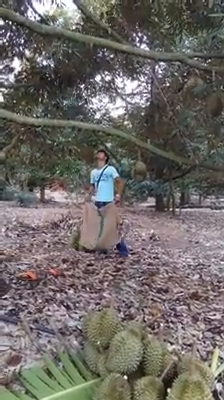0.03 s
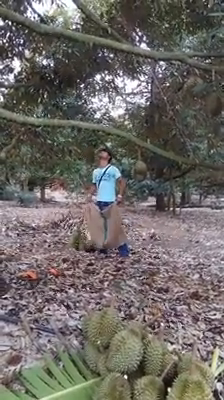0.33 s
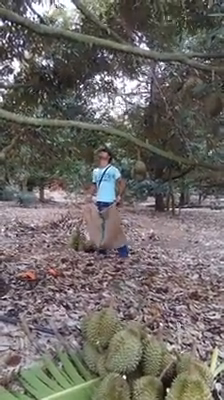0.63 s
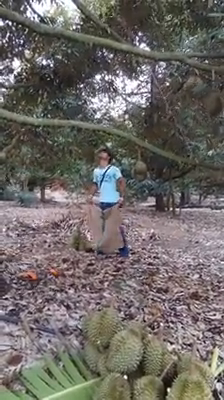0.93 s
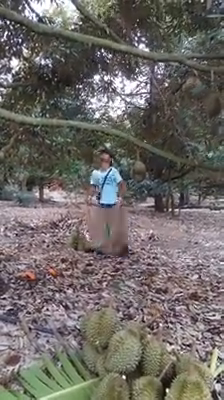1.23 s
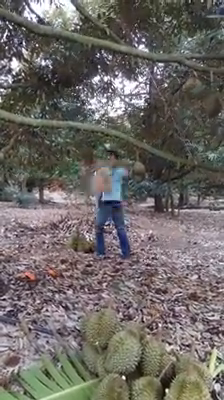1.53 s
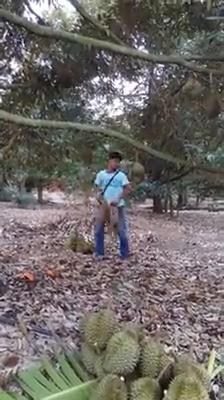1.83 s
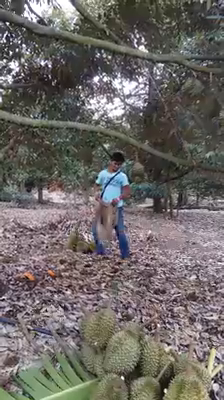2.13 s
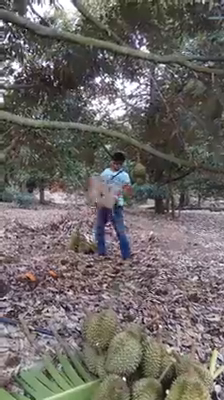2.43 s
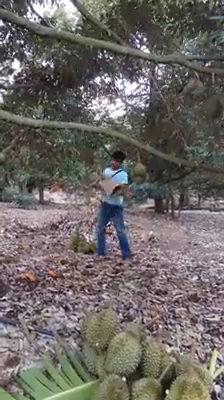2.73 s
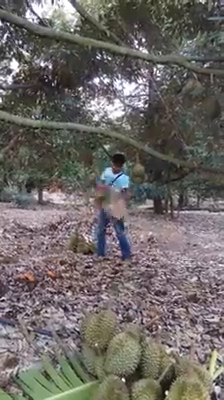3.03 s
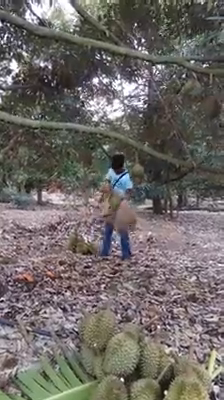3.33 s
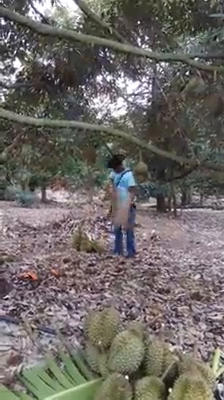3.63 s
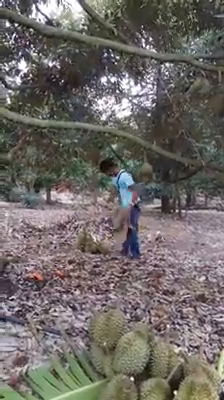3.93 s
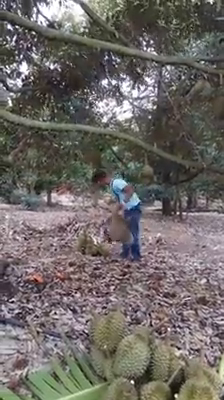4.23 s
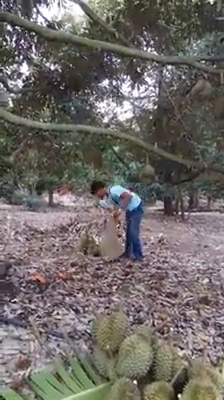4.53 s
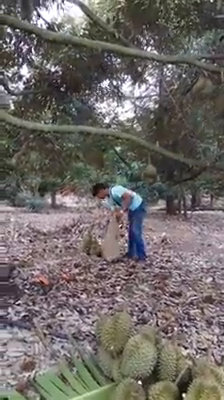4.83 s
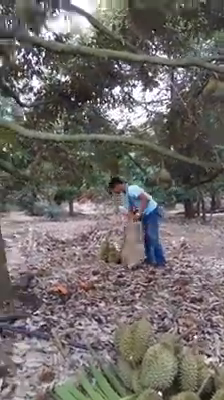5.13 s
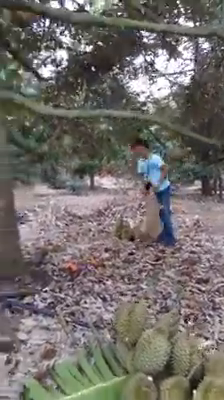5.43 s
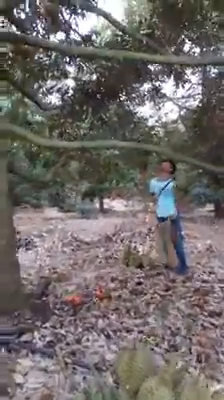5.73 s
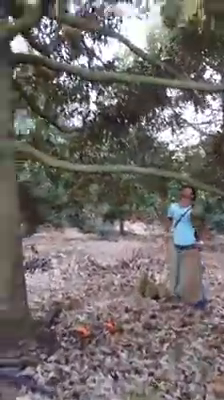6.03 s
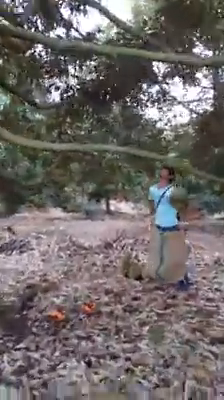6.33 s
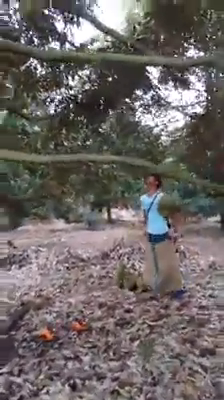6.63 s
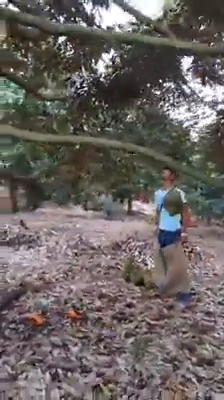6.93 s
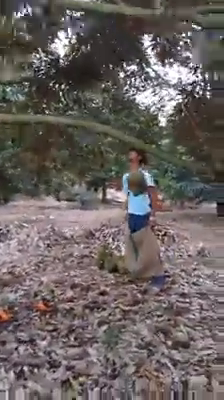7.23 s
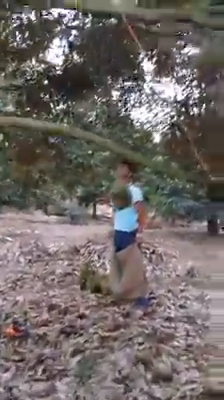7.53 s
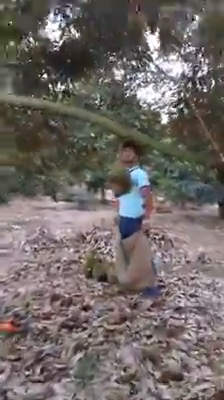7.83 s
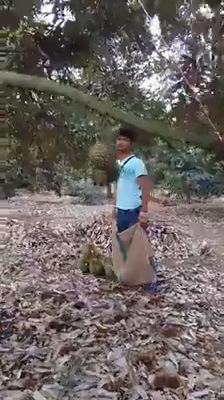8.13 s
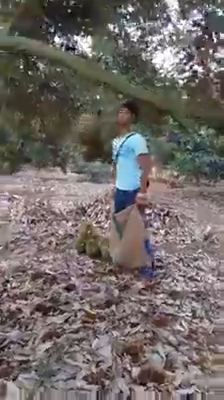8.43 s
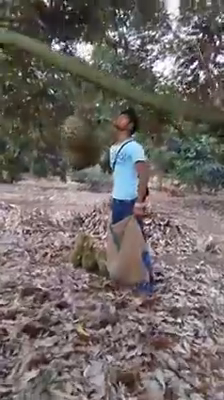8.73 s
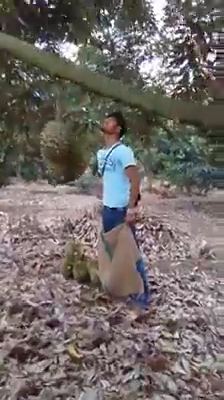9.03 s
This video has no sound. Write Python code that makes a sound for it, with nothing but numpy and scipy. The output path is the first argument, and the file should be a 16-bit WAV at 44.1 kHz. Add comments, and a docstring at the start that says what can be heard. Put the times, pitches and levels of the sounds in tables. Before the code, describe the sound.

One sharp smack of a sack catching heavy fruit, followed by steps on dry leaves and snapping twigs against a soft orchard hiss.

```python
"""A heavy spiny fruit drops from a tree into a jute sack: the impact thuds on the slack cloth,
which snaps taut with a loud smack while the spines scrape along its fibres.
Dry leaves and twigs fracture under someone's feet, mostly later, close to a microphone whose port
resonates in the treble. Behind it all are the orchard's hiss and a far engine, which the
gain control ducks for about a second after the smack."""
import sys
import numpy as np
from scipy import signal
from scipy.fft import rfft, irfft, next_fast_len
from scipy.io import wavfile
from scipy.ndimage import uniform_filter1d, minimum_filter1d

SR = 44100
rng = np.random.default_rng(int(sys.argv[2]) if len(sys.argv) > 2 else 0)


def waveform_to_disk(signal):
    """Save audio, clipped to [-1, 1], as 16-bit WAV at the path in sys.argv[1]."""
    frames = np.transpose(np.atleast_2d(signal))
    scaled = np.clip(frames, -1, 1) * 32767
    samples = np.round(scaled).astype(np.int16)
    wavfile.write(sys.argv[1], SR, samples)


N = 409688
TOUCH_S, TAUT_S = 1.673, 1.725  # the fruit meets the cloth; the cloth is taut

# spectra of the snapping cloth, the displaced air and the scraping spines: frequency_hz, level_db
CLOTH_SPECTRUM = [(40, -21.5), (250, -11), (700, -5.5), (1400, -3), (2200, -2.5), (3000, 4), (5800, 3.5),
                  (7500, -4.5), (10000, -11.5), (15500, -22)]
WHUMP_SPECTRUM = [(45, -12.5), (120, -4), (220, 1), (290, -3.5), (450, 2.5), (620, -8), (780, -14),
                  (930, -6), (1400, -10.5), (2200, -19.5), (5000, -33.5)]
SCRAPE_SPECTRUM = [(100, -31.5), (400, -29.5), (1000, -19.5), (2000, -8.5), (3000, -4), (5500, -3.5),
                   (7200, -8), (9500, -16.5), (12000, -25.5), (15500, -27)]
# spines catching in the fibres: peak_s, level_db, rise_s, t60_s
SPINE_SLIPS = [(1.730, -3.5, 0.026, 0.42), (1.753, -4.5, .003, 0.033), (1.761, -6, .003, 0.019),
               (1.778, -9, .06, 0.13), (1.809, -11.5, 0.066, 0.24)]
# stereo image of the sack: frequency_hz, coherence, left_minus_right_db
SACK_STEREO = [(100, 0.23, -7.5), (400, 0.22, -4.5), (1400, 0.11, -2), (3100, 0.25, -1), (7000, .07, -2),
               (15000, 0.0044, -2.5)]
def smack(snap_db=8.5, whump_db=-2.5):
    """Impulsive loading: the sack snaps taut and displaces air; friction on the spines brakes the fruit."""
    cloth = spread(white_pair(), SACK_STEREO)
    snap = from_db(snap_db) * burst(TAUT_S, rise=0.017, t60=0.13) * colour(cloth, CLOTH_SPECTRUM)
    shove = from_db(whump_db) * burst(TAUT_S + 0.0094, rise=0.034, t60=0.036)
    slipping = sum(from_db(db) * burst(at, rise, t60) for at, db, rise, t60 in SPINE_SLIPS)
    fibres = spread(crackle(per_s=14000, size_db=2.5), SACK_STEREO)
    return snap + shove * colour(cloth, WHUMP_SPECTRUM) + slipping * colour(fibres, SCRAPE_SPECTRUM)


# modes of the slack sack: pitch_hz, level_db, t60_s
SACK_MODES = [(189, -13, 0.025), (230, -14.5, 0.076), (460, -23, .04), (640, -23, 0.093)]
def thud(slap_db=-28, drag_db=-39, creak_db=-35, slack_hz=480, taut_hz=750):
    """Impact excites the slack cloth's damped modes; rising tension then raises the pitch of its creak."""
    tension = np.clip((clock() - TOUCH_S) / (TAUT_S - TOUCH_S), 0, 1)
    sliding = (tension > 0) & (tension < 1)
    creak_hz = slack_hz + (taut_hz - slack_hz) * tension ** 2
    creak = from_db(creak_db) * sliding * np.sin(2 * np.pi * np.cumsum(creak_hz) / SR)
    slap = from_db(slap_db) * burst(TOUCH_S + 0.0024, rise=0.006, t60=0.062)
    rubbing = slap + from_db(drag_db) * sliding
    weave = colour(spread(white_pair(), SACK_STEREO), CLOTH_SPECTRUM)
    return (knock(TOUCH_S, SACK_MODES, soft_hz=905) + creak) * pan(-2.0) + rubbing * weave


def swing_back(start_s=1.955, level_db=-24):
    """A weak second impact excites the same modes as the loaded sack swings back."""
    return from_db(level_db) * knock(start_s, SACK_MODES, soft_hz=900)


# modes of the sack's belly: pitch_hz, level_db, t60_s
BELLY_MODES = [(133, -14, 0.1), (205, -4.5, 0.066), (438, -3.5, 0.036)]
def belly():
    """Damped free vibration: the sack's belly swings out under the sudden weight."""
    return knock(TAUT_S + 0.003, BELLY_MODES, soft_hz=700) * pan(-9.5)


# footfalls: full_weight_s, level_db, heel_relative_db, roll_s, fade_s, left_minus_right_db
FOOTFALLS = [(1.33, -43.5, -7.5, 0.021, 0.18, -3), (3.80, -53.5, 5, 0.11, .7, -3),
             (4.60, -54, -3, 0.061, .5, 0), (5.47, -44.5, -10.5, .12, 0.72, -1.5),
             (6.012, -29, -15, 0.15, 0.53, -4.5), (6.27, -43, -17, 0.054, 0.55, 6),
             (6.83, -35.5, -8.5, 0.11, 0.9, -4), (7.06, -39, -15, 0.053, 0.24, -7.5),
             (7.22, -42.5, -4, 0.043, 0.28, -1), (7.568, -27, -10, .085, 0.38, -3),
             (8.255, -30.5, -4.5, 0.14, .5, -2.5), (8.856, -27.5, -13, 0.092, 0.12, -4),
             (9.19, -40, -1, 0.017, 0.39, -3)]
# spectra of crushed leaves and of the soil: frequency_hz, level_db
LEAF_SPECTRUM = [(100, -19), (300, -10.5), (600, -6), (1000, -9.5), (1400, 1), (2200, 3.5), (3000, -2),
                 (4000, 0.5), (5500, -2.5), (7200, -2.5), (9000, -12.5), (11500, -16.5), (15500, -17.5)]
SOIL_SPECTRUM = [(60, 1.5), (150, -4), (280, -0.5), (600, 0), (900, -13.5), (2000, -25.5)]
# stereo image of the leaf litter: frequency_hz, coherence, left_minus_right_db
LITTER_STEREO = [(204, 0.9, 3), (1000, 0.91, 0), (2800, 0.75, 3), (6300, 0.21, -7.5), (15000, .1, -3.5)]
def footsteps(level_db=-5.0, uneven_db=2.0, soil_db=-24):
    """Granular fracture: dry leaves crush under each foot's pressure, and the soil thumps dully."""
    pressure = sum(from_db(db) * foot_pressure(at, heel_db, roll_s, fade_s) * pan(side_db)
                   for at, db, heel_db, roll_s, fade_s, side_db in FOOTFALLS)
    grains = spread(crackle(per_s=6000, size_db=3.0), LITTER_STEREO)
    weight = sum(from_db(db + soil_db) * burst(at + 0.015, rise=0.3, t60=0.23)
                 for at, db, *_ in FOOTFALLS)
    crunch = from_db(level_db + uneven_db * drift(70)) * pressure * colour(grains, LEAF_SPECTRUM)
    return hollow_crunch(crunch) + weight * colour(grains, SOIL_SPECTRUM)


def foot_pressure(at, heel_db, roll_s, fade_s, attack_s=0.081, hold_s=0.026):
    """Loading and relaxation: the heel touches, the sole rolls down and lifts, the leaves settle."""
    phases_s = at - roll_s - attack_s + np.cumsum([0, attack_s, roll_s, hold_s, fade_s])
    pressure_db = np.interp(clock(), phases_s, [-60, heel_db, 0, 0, -60], left=-120, right=-120)
    settling = from_db(-7.5) * burst(at, attack_s, t60=0.92)
    return np.maximum(from_db(pressure_db), settling)


def hollow_crunch(x, hz=1050, width_hz=700):
    """Phase shift: an all-pass on the left channel makes the crunch hollow and wide near 1 kHz."""
    return np.array([x[0] - 2 * resonance(x[0], hz, width_hz), x[1]])


# twigs and leaves breaking: start_s, level_db, pitch_hz, left_minus_right_db, ring_db
BREAKS = [(.996, -31, 6530, -7, 9), (1.545, -27, 4120, 0, 10), (3.369, -26.5, 5210, -3, 10),
          (4.732, -32, 6800, -8, 10), (6.282, -20.5, 3550, -3, 22), (7.231, -20.5, 2060, -5, 10),
          (7.261, -22.5, 2040, -4, -1), (7.396, -26, 6020, -1, 2), (7.447, -27, 6960, 5, 10),
          (7.488, -17, 1653, -5, 7), (7.694, -21, 2210, -9, 5), (7.753, -22, 5070, -12, 0),
          (7.896, -25, 6640, -5, 15), (7.902, -21, 1490, -5, -8), (7.981, -26.5, 2170, -6, 5),
          (8.112, -27, 4970, -7, 0), (8.286, -16, 2050, -2, 4), (8.386, -26.5, 5060, -7, -1),
          (8.883, -15.5, 2516, -1, -1), (9.033, -26.5, 6000, -2, -3)]
def twig_snaps(level_db=-0.5, t60_s=0.015, ring_width_hz=260):
    """Brittle fracture: short cracks with a pitched ring, the highest near the microphone's resonance."""
    out, size = np.zeros((2, N)), 2048
    grain = colour(spread(white_pair(), LITTER_STEREO), LEAF_SPECTRUM)
    decay = from_db(-60 * np.arange(size) / SR / t60_s)
    for start_s, db, hz, side_db, ring_db in BREAKS:
        at = int(start_s * SR)
        crack = grain[:, at:at + size] * decay
        crack = crack + from_db(ring_db) * resonance(crack, hz, ring_width_hz)
        out[:, at:at + size] += from_db(db + level_db) * pan(side_db) * crack / np.abs(crack).max()
    return out


def leaf_ticks(level_db=-62, stirred_db=5):
    """Sparse random impulses: single leaves tick faintly, louder once the walker stirs the litter."""
    walking = np.interp(clock(), [5.0, 6.0], [0, 1])
    ticks = spread(crackle(per_s=60, size_db=3.0), LITTER_STEREO)
    return from_db(level_db + stirred_db * walking) * colour(ticks, LEAF_SPECTRUM)


# spectrum of the orchard's ambient noise: frequency_hz, level_db
AIR_SPECTRUM = [(25, 1.5), (50, 2), (85, 10), (170, 6.5), (250, 2.5), (350, 0), (600, 1.5), (1500, 0.5),
                (5000, -0.5), (7000, -3.5), (8500, -10.5), (11500, -22), (15500, -23.5)]
# its stereo image: frequency_hz, coherence, left_minus_right_db
AIR_STEREO = [(130, 1, 1), (290, 0.93, 1.5), (640, 0.81, 1.5), (1410, 0.064, -.5), (2970, 0.48, 0.5),
              (6800, 0.047, -0.5), (15000, .03, 0.5)]
def orchard_air(level_db=-47.5, waver_db=0.5):
    """Incoherent summation: far insects and foliage merge into an even hiss over a low rumble."""
    hiss = colour(spread(white_pair(), AIR_STEREO), AIR_SPECTRUM)
    return from_db(level_db + waver_db * drift(14)) * hiss * pan(-0.8)


# course of the engine: time_s, firing_hz, level_db
ENGINE_COURSE = [(0.1, 131.3, -51), (1.294, 131.2, -54), (1.55, 132.6, -51.5), (3.2, 136.5, -53),
                 (3.44, 137.8, -51), (4.12, 133.5, -54.5), (4.96, 138.2, -54.5), (6.39, 142.0, -53),
                 (6.51, 138.7, -56.5), (6.71, 141.1, -54.5), (9.29, 135.3, -61)]
# its spectral lines: multiple_of_firing_rate, level_db
ENGINE_LINES = [(1 / 3, -22.5), (2 / 3, -5.5), (1, 0), (5 / 3, -24.5), (2, -21.5)]
def far_engine(waver_db=0.06, jitter=0.008):
    """Periodic firing of three cylinders: only the lowest orders carry this far, and they fade late on."""
    time_s, firing_hz, level_db = np.transpose(ENGINE_COURSE)
    rate_hz = np.interp(clock(), time_s, firing_hz) * (1 + jitter * drift(25))
    firings = np.cumsum(rate_hz) / SR
    lines = sum(from_db(db + waver_db * drift(12)) * np.sin(2 * np.pi * (order * firings + rng.random()))
                for order, db in ENGINE_LINES)
    return from_db(np.interp(clock(), time_s, level_db)) * np.sqrt(2) * lines


# spectrum of the sound scattered by the trees: frequency_hz, level_db
SCATTER_SPECTRUM = [(80, -5.5), (200, -3.5), (400, -11), (800, 2.5), (1500, 6.5), (3000, 2), (6000, -9),
                    (9000, -20), (15500, -32)]
def tree_scatter(x, wet_db=-21, t60_s=0.63):
    """Scattering from trunks and crowns returns a thin, dull reverberant tail."""
    tail = colour(white_pair(), SCATTER_SPECTRUM) * burst(0.024, rise=0.06, t60=t60_s)
    tail = tail[:, :SR] / np.sqrt(np.sum(tail ** 2) / 2)
    return from_db(wet_db) * signal.fftconvolve(x, tail, axes=1)[:, :N]


def ground_bounce(x, delay_s=0.00215, reflection=0.21):
    """Comb filtering: the delayed ground reflection interferes with the direct sound."""
    return x + reflection * np.array([np.interp(clock() - delay_s, clock(), side) for side in x])


def gain_control(x, limit_db=-4.5, hold_s=0.91, release_db_per_s=40,
                 linger_share=0.17, linger_db_per_s=2.5, bass_share=0.75):
    """Limiting: gain drops at once, holds, then recovers in two slopes; the bass is ducked less."""
    power = np.abs(uniform_filter1d(np.mean(x ** 2, axis=0), size=200))
    excess_db = np.maximum(10 * np.log10(power + 1e-12) - limit_db, 0)
    span = int(hold_s * SR) // 2 * 2 + 1
    held_db = -minimum_filter1d(-excess_db, span, origin=span // 2)  # maximum over the past hold_s
    fast, slow = release_db_per_s * clock(), linger_db_per_s * clock()
    releasing_db = np.maximum.accumulate(held_db + fast) - fast
    lingering_db = np.maximum.accumulate(linger_share * held_db + slow) - slow
    cut_db = np.maximum(releasing_db, lingering_db)
    bass = signal.sosfilt(signal.butter(1, 200, fs=SR, output="sos"), x)
    return (x - bass) * from_db(-cut_db) + bass * from_db(-bass_share * cut_db)


def knock(at, modes, soft_hz):
    """Modal superposition: a soft blow rings a few modes; open cloth radiates little deep bass."""
    blow = np.zeros(N)
    blow[int(at * SR)] = 1
    blow = signal.sosfilt(signal.butter(2, [80, soft_hz], "band", fs=SR, output="sos"), blow + 1e-18)
    return sum(from_db(db) * ring(blow, hz, t60) for hz, db, t60 in modes)


def ring(x, hz, t60):
    """Damped oscillator: a unit impulse starts a decaying sine of height 1."""
    r, w = from_db(-60 / (t60 * SR)), 2 * np.pi * hz / SR
    return signal.lfilter([0, np.sin(w)], [1, -2 * r * np.cos(w), r * r], x + 1e-18)


def resonance(x, hz, width_hz):
    """Second-order band-pass with unit peak gain."""
    return signal.lfilter(*signal.iirpeak(hz, hz / width_hz, fs=SR), x)


def burst(at, rise, t60):
    """Exponential envelope: up 60 dB in `rise` seconds to its peak, then down 60 dB every `t60`."""
    t = clock() - at
    return from_db(-60 * np.minimum(np.maximum(-t / rise, t / t60), 5))


def crackle(per_s, size_db):
    """Shot noise: two streams of tiny fractures of very uneven size."""
    sizes = from_db(size_db * np.minimum(rng.exponential(1, (2, N)), 4))
    return rms_one((rng.random((2, N)) < per_s / SR) * sizes * rng.choice([-1, 1], (2, N)))


def white_pair():
    """Two independent white noises."""
    return rng.standard_normal((2, N))


def spread(pair, image):
    """Mid-side mixing: two unrelated signals get a coherence and a balance at each frequency."""
    size = next_fast_len(N)
    hz = np.arange(size // 2 + 1) * SR / size
    coherence, sides = np.clip(at_hz(image, hz), -1, 1), np.array([[1], [-1]])
    balance = from_db(sides * at_hz(image, hz, column=2) / 2)
    mid, side = rfft(pair, size)
    left_right = np.sqrt(1 + coherence) * mid + np.sqrt(1 - coherence) * side * sides
    return irfft(left_right * balance, size)[:, :N]


def colour(x, spectrum):
    """Spectral shaping of a steady signal, scaled to rms 1."""
    size = next_fast_len(N)
    gain = from_db(at_hz(spectrum, np.arange(size // 2 + 1) * SR / size))
    return rms_one(irfft(rfft(x, size) * gain, size)[..., :N])


def at_hz(points, hz, column=1):
    """Interpolate a table column over log frequency."""
    rows = np.array(points)
    return np.interp(np.log(hz + 1e-6), np.log(rows[:, 0]), rows[:, column])


def drift(rate_hz):
    """Slow random fluctuation of rms 1."""
    knots = rng.standard_normal(int(N / SR * rate_hz) + 2)
    return rms_one(np.interp(clock() * rate_hz, np.arange(len(knots)), knots))


def pan(db):
    """Constant-power gains for a left-minus-right level difference."""
    return rms_one(from_db(np.array([[db], [-db]]) / 2))


def from_db(db):
    """Decibels to amplitude ratio."""
    return 10 ** (np.asarray(db) / 20)


def rms_one(x):
    """Scale to rms 1."""
    return x / np.sqrt(np.mean(x ** 2) + 1e-20)


def clock():
    """Time of each sample in seconds."""
    return np.arange(N) / SR


def scene():
    """Superposition of the catch, the steps, their scatter from the trees and the background."""
    catch = thud() + ground_bounce(smack()) + belly() + swing_back()
    near = catch + footsteps() + twig_snaps() + leaf_ticks()
    return near + tree_scatter(near) + orchard_air() + far_engine()


def record(dry, port_hz=6480, port_width_hz=750, port_db=12.5, low_cut_hz=65, high_cut_hz=15650):
    """Transduction: bass roll-off and port resonance, then gain control, clipping and a steep low-pass."""
    sensed = signal.sosfilt(signal.butter(2, low_cut_hz, "high", fs=SR, output="sos"), dry)
    ducked = gain_control(sensed + from_db(port_db) * resonance(sensed, port_hz, port_width_hz))
    low_pass = signal.ellip(10, 0.1, 70, high_cut_hz, fs=SR, output="sos")
    return signal.sosfilt(low_pass, np.clip(ducked, -1, 1))


dry = scene()
out = record(dry)
waveform_to_disk(out)
```